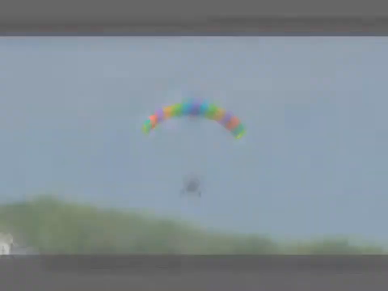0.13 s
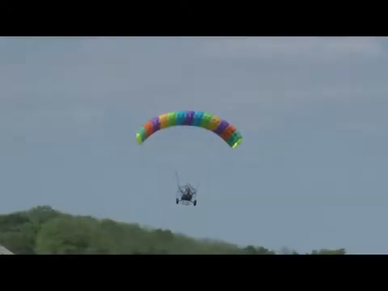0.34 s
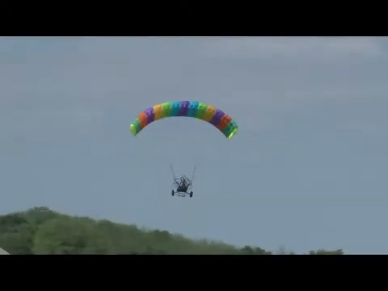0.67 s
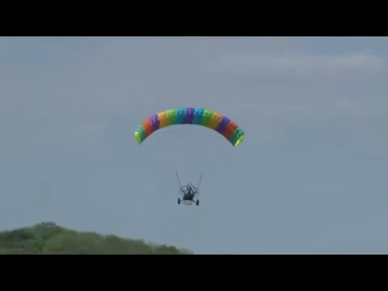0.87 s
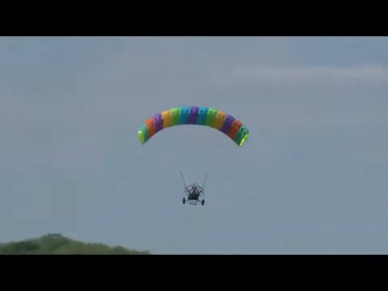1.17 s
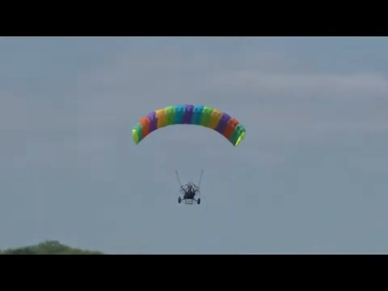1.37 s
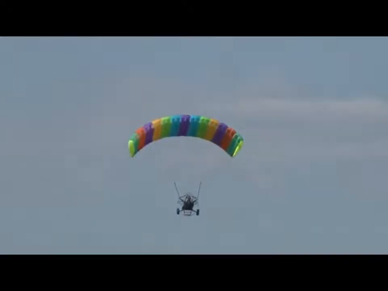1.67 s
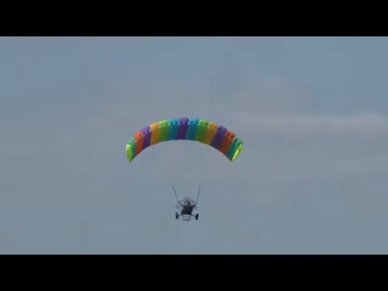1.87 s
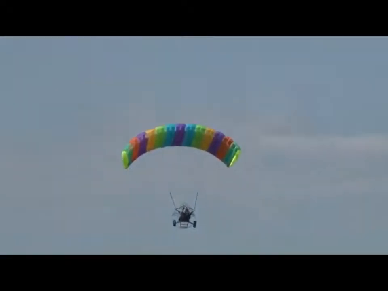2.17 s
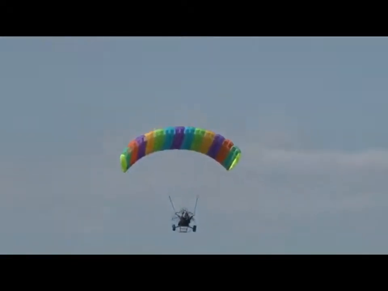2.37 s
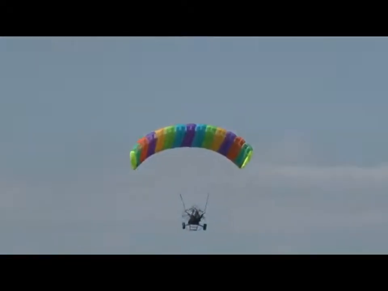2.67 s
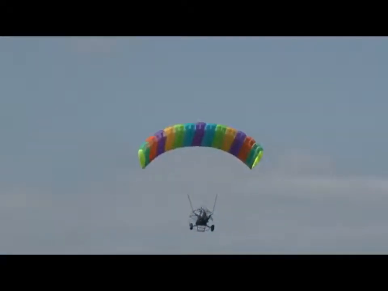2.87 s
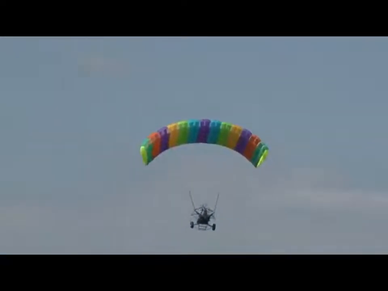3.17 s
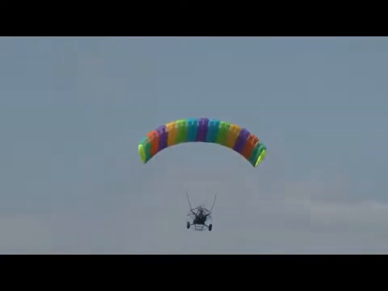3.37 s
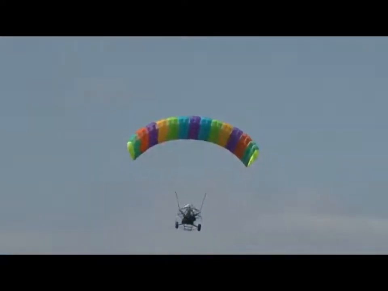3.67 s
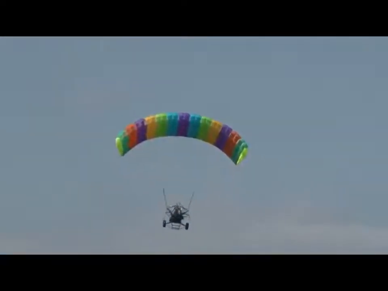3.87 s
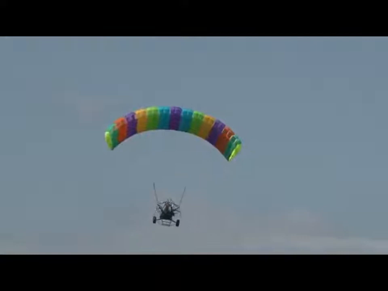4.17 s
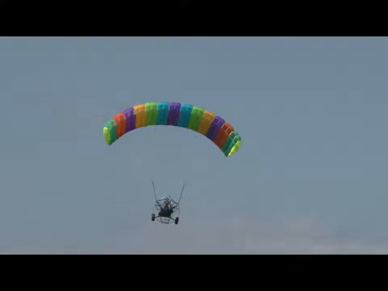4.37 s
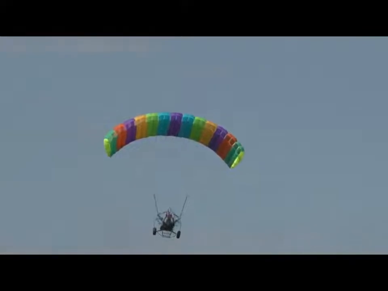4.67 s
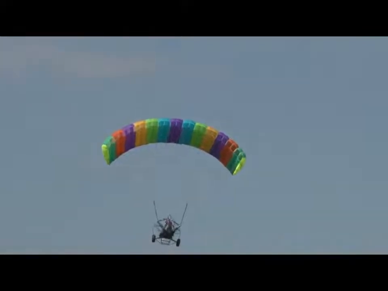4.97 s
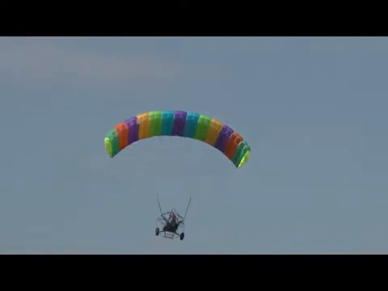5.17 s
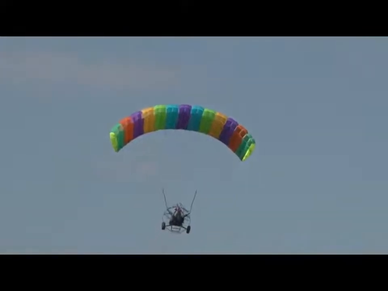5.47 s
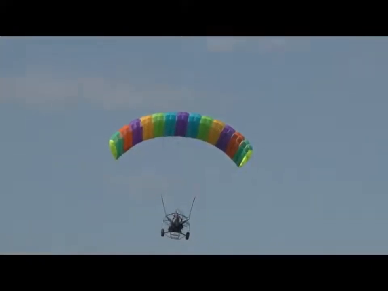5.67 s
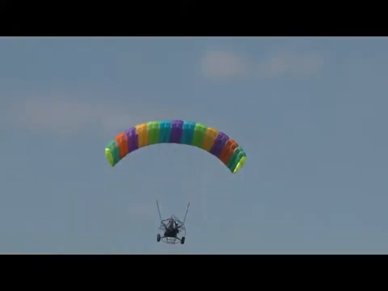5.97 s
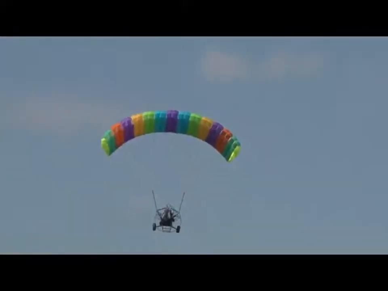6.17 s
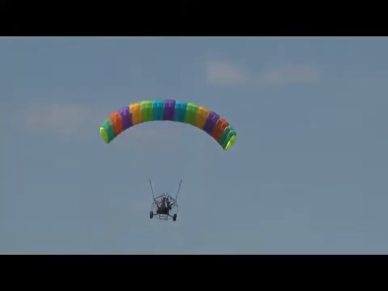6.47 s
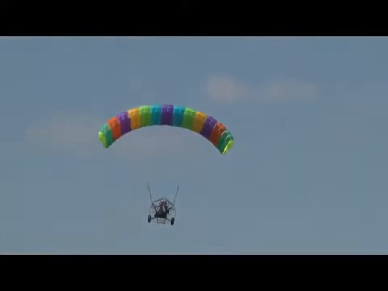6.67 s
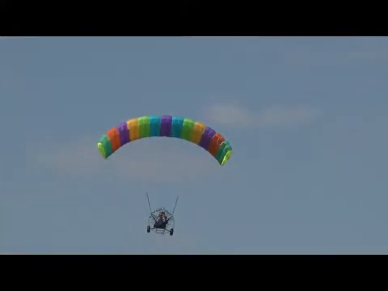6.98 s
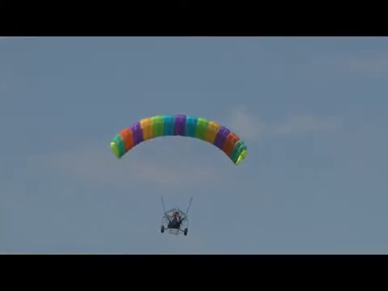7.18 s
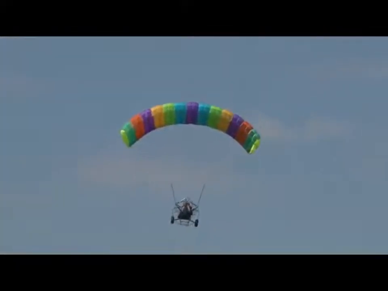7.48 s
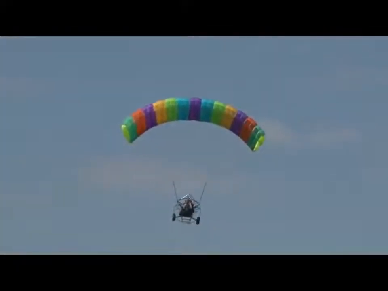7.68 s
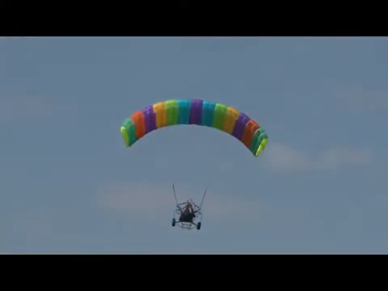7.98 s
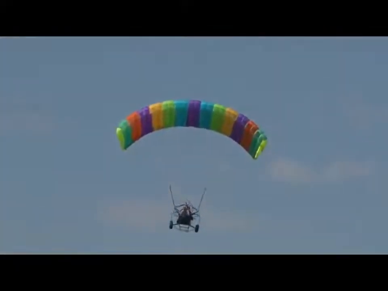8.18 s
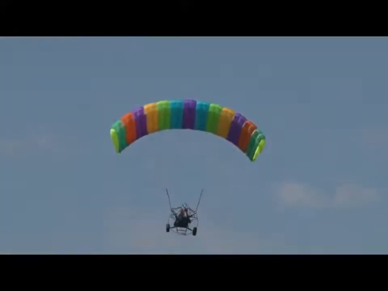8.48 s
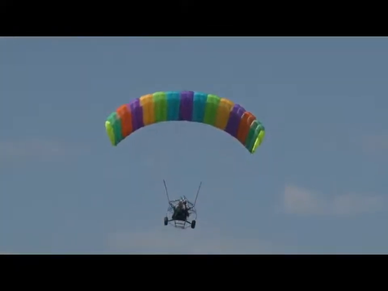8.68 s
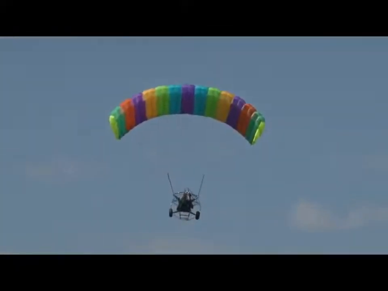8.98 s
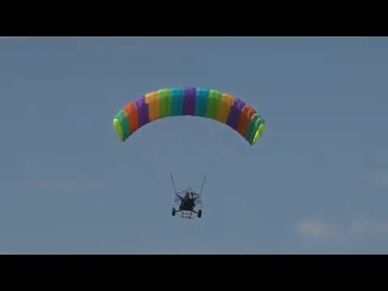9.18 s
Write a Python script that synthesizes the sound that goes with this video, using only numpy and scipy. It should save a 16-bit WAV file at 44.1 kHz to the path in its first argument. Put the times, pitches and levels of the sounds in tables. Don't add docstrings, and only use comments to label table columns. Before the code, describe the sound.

Outdoors on an open airfield, a small two-stroke engine with a pusher propeller drones at a nearly constant pitch. It starts fairly distant and mid-heavy, then swells over several seconds into a louder, raspier buzz with a rushing, chopped-air hiss. Reflections give it a slowly shifting hollow colour. Low wind thumps touch the left side of a handheld camera's stereo microphone.

```python
import sys
import numpy as np
from scipy import signal
from scipy.fft import rfft, irfft
from scipy.io import wavfile
from scipy.ndimage import uniform_filter1d

SR = 44100
rng = np.random.default_rng(int(sys.argv[2]) if len(sys.argv) > 2 else 0)


def int16_out(signal):
    q = np.round(np.clip(np.atleast_2d(signal).T, -1, 1) * 32767)
    wavfile.write(sys.argv[1], SR, q.astype(np.int16))


def boost_factor(decibels):
    exponent = np.asarray(decibels, float) / 20
    return 10 ** exponent


N = 411894

# t/s, f/Hz
FIFTH_BLADE_HZ = [(0.0, 654.4), (1.48, 654.8), (2.47, 651.7), (3.46, 645.6), (7.1, 644.8), (7.6, 647),
                  (9.34, 649.5)]
# multiple of blade rate, level/dB
BLADE_HARMONICS = [(1, -6), (2, -13.5), (3, 2), (4, -6), (5, -4.5), (6, -13), (7, -11.5), (8, -13.5),
                   (9, -21), (10, -18), (11, -16), (12, -16.5), (13, -22.5), (14, -17), (15, -23.5),
                   (16, -42.5), (17, -22.5), (18, -29.5)]
BLADE_ANCHORS = [1, 2, 3, 4, 5, 6, 7, 8, 9, 10, 11, 12, 13]
# far level/dB, near level/dB, halfway t/s
BLADE_RISE = [(-46, -44.5, 4), (-47, -31.5, 5.1), (-41.5, -28.5, 1.7), (-31.5, -25, 2.74), (-25, -19, 3.1),
              (-40, -31.5, 3.1), (-40, -33.5, 2.73), (-42, -35, 3), (-42.5, -37.5, 5.3),
              (-47.5, -38.5, 1.8), (-39.5, -38.5, 5.5), (-41.5, -41.5, 1.7), (-49, -44, 1.3)]
# t/s, multiple of blade rate, level/dB, half length/s
BLADE_FADES = [(0.53, 9, 3, 1.0), (1.2, 1, 3.5, 0.26), (1.9, 4, -16.5, 0.26), (2.05, 5, -6.5, 0.14),
               (7.8, 7, -2.5, 0.87), (3.2, 9, -5, 0.4), (3.13, 3, -3, 0.66), (3.4, 1, 9, 0.18),
               (4.4, 1, -5.5, 0.5), (3.42, 2, 10.5, .5), (4.8, 4, -13, 0.42), (4.9, 7, -12.5, 0.23),
               (3.1, 11, -2, 0.41), (6, 6, -19, 0.46), (6.75, 5, 7, 0.53), (6.017, 1, 2, 1),
               (6.409, 9, -5.5, .5), (10.5, 3, -5.5, 0.27), (7, 5, -8.5, .4), (7.3, 6, -10, 0.26),
               (8.2, 8, -11, 0.99), (8.5, 5, 4, .3), (9.14, 4, -9.5, 0.75), (9.09, 1, -10.5, 0.46),
               (9.21, 6, 5, 0.58), (2.16, 10, 6.5, 0.3), (5.6, 10, -11.5, 0.54), (5.5, 12, -7.5, 0.88),
               (7.83, 12, 11.5, .45), (6.75, 7, 7, 0.047)]
# fifth harmonic level/dB, roar level/dB, halfway t/s, rise/s
TILT_DROP = (-14.5, -2, 7, 0.12)
# multiple of crank rate, level/dB
EXHAUST_HARMONICS = [(1, -18), (2, 2), (3, -4.5), (4, 5), (5, -19), (6, -9), (8, -3), (10, -31)]
# far level/dB, near level/dB, halfway t/s, rise/s
EXHAUST_RISE = [
    (-53, -51, 5.9, .5),
    (-49, -24.5, 4.9, 0.97),
    (-59, -41, 3.2, 1),
    (-42, -29.5, 2.03, 0.55),
    (-35.5, -51, 3.5, .3),
    (-60, -54.5, 3.8, .5),
]
# f/Hz, level/dB per Hz
ROAR_SPECTRUM = [(40, -40.5), (150, -22.5), (300, -10.5), (450, -6), (650, 0), (900, -10.5), (1300, -29),
                 (2000, -43.5), (4000, -110)]
RUSH_SPECTRUM = [(200, -42.5), (400, -19), (700, -23), (1000, -2), (1500, 6), (2200, 4.5), (3000, -2.5),
                 (4200, -11), (6000, -53.5), (8000, -100)]
TREBLE_SPECTRUM = [(1500, -30), (2600, -2), (3400, 1), (4000, -2.5), (5000, -7), (6000, -13), (7000, -17),
                   (7600, -23), (8300, -31), (8900, -39), (9300, -70)]
# far level/dB, near level/dB, halfway t/s
WAKE_RISE = [
    (-36, -29.5, 2.9),
    (-27.5, -23, 5.98),
    (-44, -40.5, 6.13),
]
# t/s, half length/s, middle level/dB, treble level/dB
WAKE_SURGES = [(.45, 0.072, 2.5, -6), (1.26, 0.35, 0.5, 3.5), (5.117, 0.016, 1.5, 4),
               (1.948, 0.22, 1.5, 9.5), (2.2, 0.65, 7.5, -1), (2.868, 0.25, -0.5, 5),
               (4.124, 0.31, 4.5, 6.5), (4.747, 0.28, 4, 3.5), (5.115, 0.2, 0, 5), (6.564, 0.1, 2.5, 3),
               (7.723, 0.22, 3, 9), (8.62, 0.13, 2, 7.5), (9.264, 0.41, 4, 5)]
# t/s, far ground lag/ms, second bounce lag/ms, near ground lag/ms
BOUNCE_LAGS = [(0, 0.86, 1.83, 0.98), (2.2, .9, 1.6, 0.34), (2.7, 1, 1.7, 0.5), (3.3, 0.74, 1.91, 0.58),
               (4, 1.0, 1.6, 0.6), (4.6, 1.17, 2, 0.72), (5.3, 1.56, 1.9, 0.85), (6, 1.805, 2.07, 0.998),
               (7.001, 2.29, 2.12, 1.104), (7.999, 2.7, 2.18, 1.1), (9.34, 3.7, 2.42, 1.5)]
# t/s, far ground, second bounce, near ground
BOUNCE_GAINS = [(0, 0.3, 0.12, 0.1), (2.301, 0.29, 0.17, 0.11), (3.301, .05, .35, 0.54),
                (3.9, 0.2, .4, 0.4), (4.401, 0.2, .6, 0.13), (4.8, 0.22, 0.5, 0.2),
                (5.601, 0.38, 0.52, 0.28), (7.2, 0.25, 0.59, 0.22), (8, 0.07, 0.59, 0.12),
                (9.34, .15, 0.38, 0.1)]
BOUNCE_PHASE = (-1.02, 0.044, -1.84)
BOUNCE_TOP_HZ = (4500, 1300, 3940)
# f/Hz, level/dB, phase/rad, likeness (0-1)
RIGHT_PORT = [(30, -30, 1.1, .5), (110, -13, 1.1, .9), (230, -10, .9, .99), (390, -9, 1.1, .99),
              (520, -.3, .8, .98), (720, -5, .5, .8), (1250, 5, .2, .9), (2000, .2, -.2, .85),
              (3200, 3.5, -.6, .85), (3550, -9, -.6, .5), (4050, 1.6, -.1, .75), (4700, -6, .4, .4),
              (5400, 6.5, .35, .65), (8200, 11, -.4, .15)]
# early level/dB, late level/dB, halfway t/s
BREEZE = (-52.5, -67, 7.6)
# t/s, level/dB, half length/s
WIND_THUMPS = [(0.11, -46, .1), (0.505, -50, 0.17), (1.345, -44, 0.03), (2.55, -47, 0.056),
               (2.753, -51, 0.026), (3.332, -52, 0.091), (3.64, -57, .03), (4.306, -57, .04),
               (4.526, -49, .03), (5.05, -52, 0.059), (5.36, -51, 0.096), (5.89, -38.5, 0.18),
               (6.247, -48, 0.079), (6.6, -52, .04), (6.893, -52, 0.094), (7.28, -44, 0.095),
               (8.17, -48, .05), (8.664, -49, 0.054)]

CRANK_PER_BLADE = .8745
PORT_LAG_S = 6.5 / SR


def level(x):
    return x / np.sqrt(np.mean(x ** 2))


def curves(table):
    s, *columns = np.transpose(table)
    return [np.interp(np.arange(N) / SR, s, c) for c in columns]


def along_hz(table):
    hz, *columns = np.transpose(table)
    bins = np.log(np.arange(N // 2 + 1) * SR / N + 1)
    return [np.interp(bins, np.log(hz), c) for c in columns]


def rise(far_db, near_db, half_s, rise_s=0.17):
    return far_db + (near_db - far_db) / (1 + np.exp((half_s - np.arange(N) / SR) / rise_s))


def bump(at_s, half_s):
    return np.exp(-((np.arange(N) / SR - at_s) / half_s) ** 2)


def walk(rate):
    k = int(SR / rate)
    held = np.repeat(rng.standard_normal(N // k + 1), k)
    return level(uniform_filter1d(uniform_filter1d(held, k), k)[:N])


def band(x, lo_hz, hi_hz):
    return signal.sosfilt(signal.butter(2, [lo_hz, hi_hz], "band", fs=SR, output="sos"), x)


def tones(turns, orders, anchors, heard_db, shimmer_db, wobble, spread):
    out, own_db = 0, dict(orders)
    swell_db = np.array([db - own_db[k] for k, db in zip(anchors, heard_db)])
    for k, db in orders:
        share = [np.interp(k, anchors, row) for row in np.eye(len(anchors))]
        slip = spread * rng.standard_normal() + wobble * np.sqrt(k) * walk(14)
        partial_db = db + share @ swell_db + shimmer_db * walk(40)
        out = out + boost_factor(partial_db) * np.cos(2 * np.pi * k * turns + slip)
    return np.sqrt(2) * out


def blade_turns():
    hz = uniform_filter1d(curves(FIFTH_BLADE_HZ)[0], SR // 2) / 5
    return np.cumsum(hz * (1 + .001 * walk(25))) / SR


def blade_db():
    rows = []
    for own, growth in zip(BLADE_ANCHORS, BLADE_RISE):
        fades = sum(db * bump(s, half) for s, k, db, half in BLADE_FADES if round(k) == own)
        rows.append(rise(*growth) + fades)
    fifth = BLADE_ANCHORS.index(5)
    rows[fifth] = rows[fifth] + rise(0, TILT_DROP[0], *TILT_DROP[2:])
    return rows


def blade_tones(turns):
    return boost_factor(2.03) * tones(turns, BLADE_HARMONICS, BLADE_ANCHORS, blade_db(),
                             shimmer_db=1.85, wobble=0.08, spread=0.94)


def exhaust_tones(turns):
    firing_db = np.array([rise(*row) for row in EXHAUST_RISE]) + 3.34
    return tones(turns * CRANK_PER_BLADE, EXHAUST_HARMONICS, [1, 2, 3, 4, 6, 8], firing_db,
                 shimmer_db=1.2, wobble=.12, spread=.8)


def chopped_wake(turns, steady, width, slap_db, crack_db):
    blade = turns.astype(int)
    size, crack, late = rng.standard_normal((blade[-1] + 1, 3)).clip(-2, 2).T
    gate = steady + boost_factor(slap_db * size)[blade] * np.exp(-(turns % 1) / width)
    noise = gate * rng.standard_normal((2, N))
    crack_turn = np.arange(len(late)) + .3 + .15 * late
    at = np.searchsorted(turns, crack_turn).clip(0, N - 1)
    noise[:, at] += boost_factor(crack_db) * crack
    return rfft(noise / uniform_filter1d(gate, SR // 4))


def coloured(spectrum, colour):
    return level(irfft(spectrum * boost_factor(along_hz(colour)[0]), N))


def wake_db():
    lift = 0
    for s, half, mid_db, top_db in WAKE_SURGES:
        lift = lift + np.array([[0], [mid_db], [top_db]]) * bump(s, half)
    flicker = np.array([rise(0, *TILT_DROP[1:]), 1.1 * walk(9), 1.0 * walk(16)])
    return np.array([rise(*row) for row in WAKE_RISE]) + lift + flicker


def wake_rush(turns):
    low_db, rush_db, treble_db = wake_db()
    chop = chopped_wake(turns, steady=1.0, width=.13, slap_db=3.5, crack_db=21.0)
    tips = chopped_wake(turns, steady=1.3, width=.1, slap_db=3.0, crack_db=15.0)
    air = boost_factor(low_db + 5.5) * coloured(chop, ROAR_SPECTRUM)
    air = air + boost_factor(rush_db - 1.0) * coloured(chop, RUSH_SPECTRUM)
    return air + boost_factor(treble_db + 4.0) * coloured(tips, TREBLE_SPECTRUM)


def bounced(x):
    hz = np.arange(N // 2 + 1) * SR / N
    at = np.arange(N)
    out, thin = x, rfft(x) / (1 + (330 / (hz + 1)) ** 2)
    paths = zip(curves(BOUNCE_LAGS), curves(BOUNCE_GAINS), BOUNCE_PHASE, BOUNCE_TOP_HZ)
    for ms, gain, rad, top_hz in paths:
        turned = irfft(thin * np.exp(1j * rad) / (1 + (hz / top_hz) ** 2), N)
        delayed = np.array([np.interp(at - ms * SR / 1000, at, v) for v in turned])
        out = out + np.clip(gain, 0, 1) * delayed
    return out * np.clip(np.minimum(at, N - at) / 100, 0, 1)


def at_ports(hum, air):
    hum, near, other = rfft(bounced([hum, *air]))
    gain_db, phase, like = along_hz(RIGHT_PORT)
    like = np.clip(like, 0, 1)
    omega = 2 * np.pi * np.arange(len(phase)) * SR / N
    lead = np.exp(1j * (phase + omega * PORT_LAG_S))
    right = (hum + np.sqrt(like) * near + np.sqrt(1 - like) * other) * boost_factor(gain_db) * lead
    return irfft([hum + near, right], N)


def wind():
    thump = band(rng.standard_normal((2, N)), 28.0, 150.0) * boost_factor(2.0 * walk(12))
    gusts = boost_factor(rise(*BREEZE) + 1.7 * walk(6))
    gusts = gusts + sum(boost_factor(db) * bump(s, half) for s, db, half in WIND_THUMPS)
    return level(thump) * gusts * boost_factor(np.array([[5.], [-22.]]))


def scene():
    turns = blade_turns()
    hum = blade_tones(turns) + exhaust_tones(turns)
    aircraft = at_ports(hum, wake_rush(turns))
    fade = boost_factor(-8.5 * np.exp(-np.arange(N) / SR / 0.33))
    return fade * (aircraft + wind())


def starved(x):
    hz, s, cells = signal.stft(x, SR, nperseg=1024)
    power = np.abs(cells) ** 2
    usual = uniform_filter1d(power[:, (hz > 5500) & (hz < 6500)].mean(axis=(0, 1)), size=9)
    bar_db = rise(-9.5, -22, 6) + 2 * walk(3) + 2 * walk(20)
    bar_db = np.interp(s * SR, np.arange(N), bar_db)
    near = uniform_filter1d(uniform_filter1d(power, size=3, axis=1), size=2, axis=2)
    keep = (near > usual * boost_factor(2 * bar_db)) | (hz < 6600)[:, None]
    return signal.istft(cells * keep, SR, nperseg=1024)[1][:, :N]


def roll_off(x):
    return signal.sosfilt(signal.butter(12, 9080, fs=SR, output="sos"), x)


def record(dry):
    rounded = dry / (1 + (dry / .99) ** 8) ** (1 / 8)
    mix = starved(rounded)
    return roll_off(mix)


dry = scene()
out = record(dry)
int16_out(out)
```